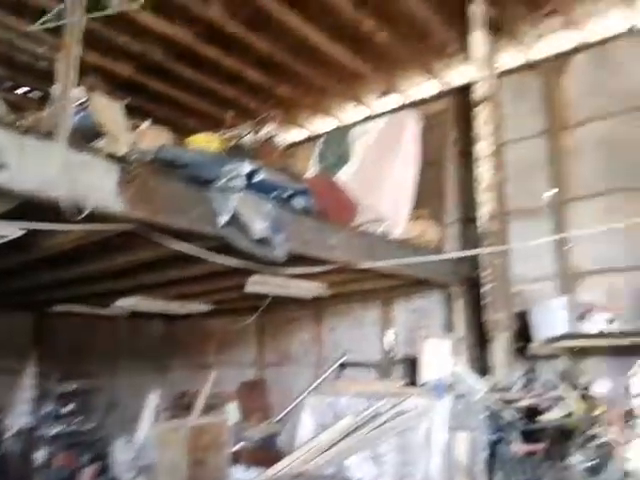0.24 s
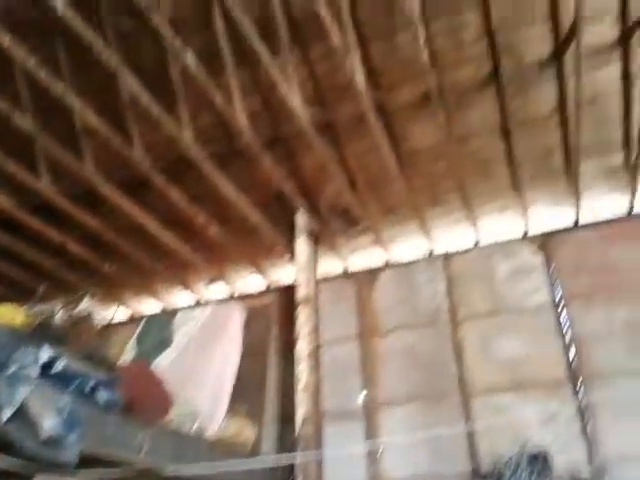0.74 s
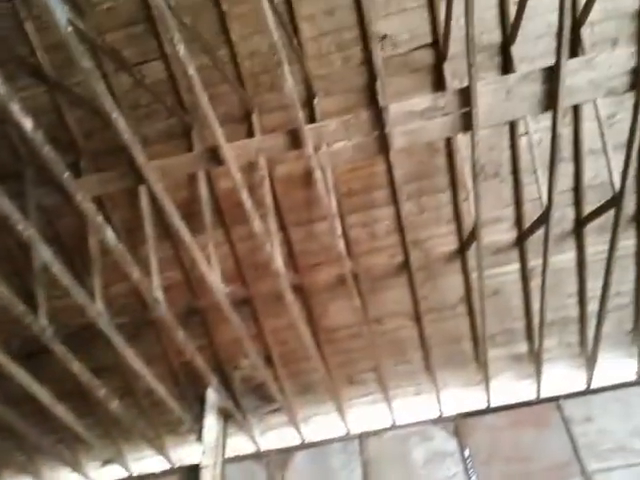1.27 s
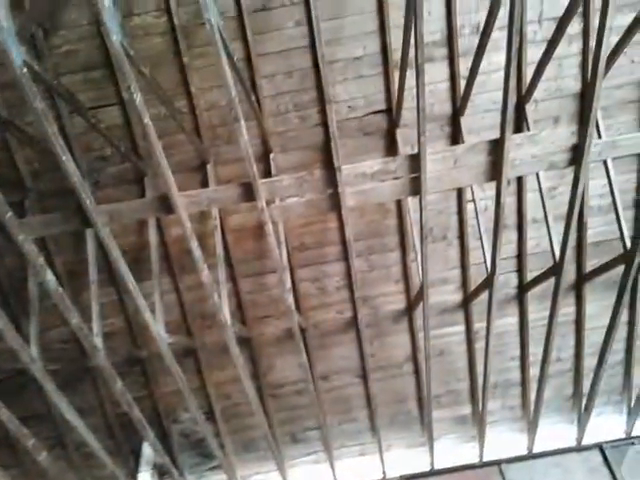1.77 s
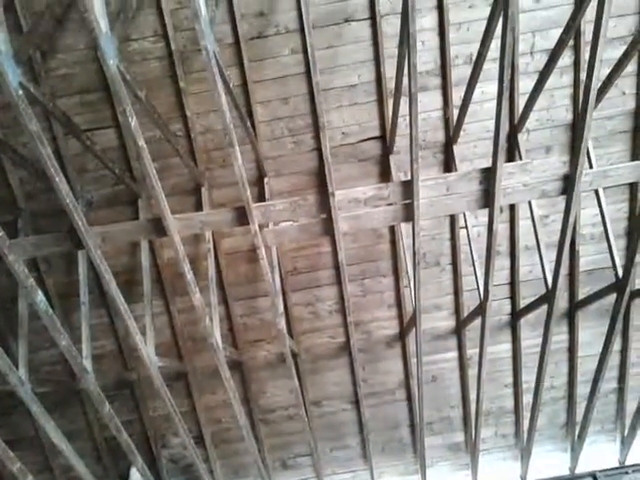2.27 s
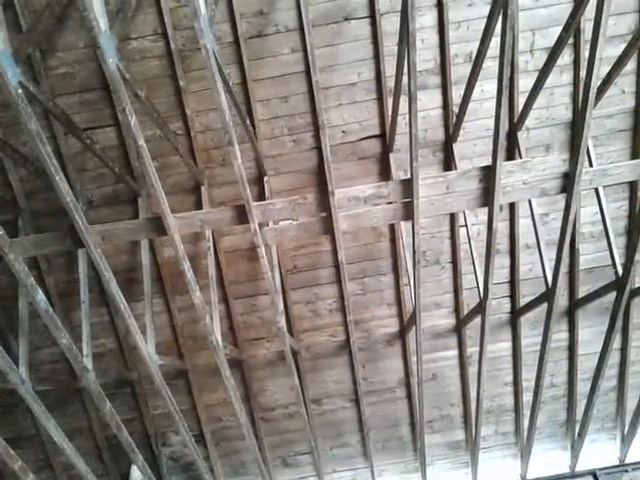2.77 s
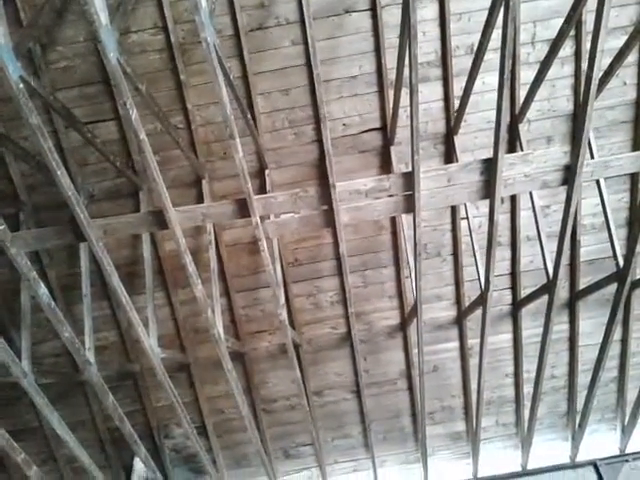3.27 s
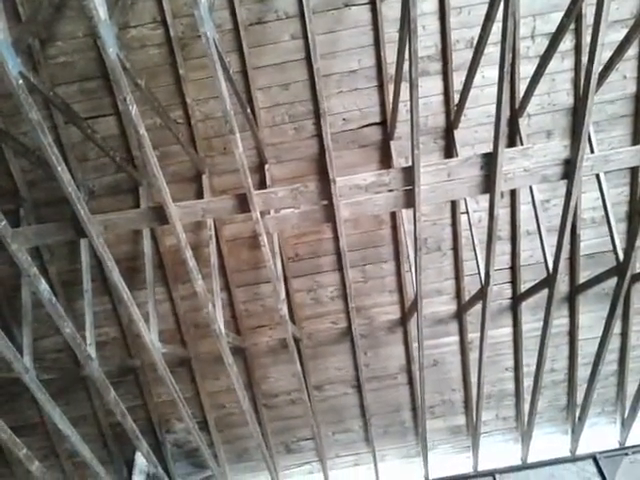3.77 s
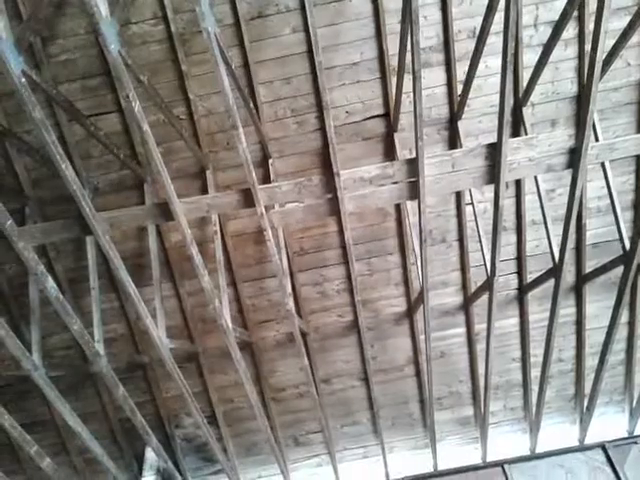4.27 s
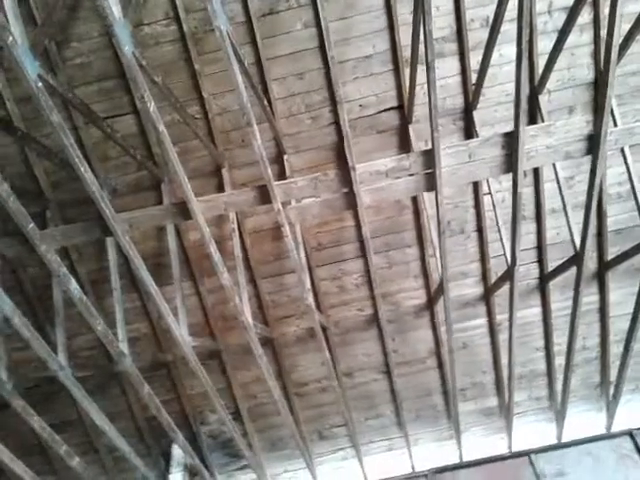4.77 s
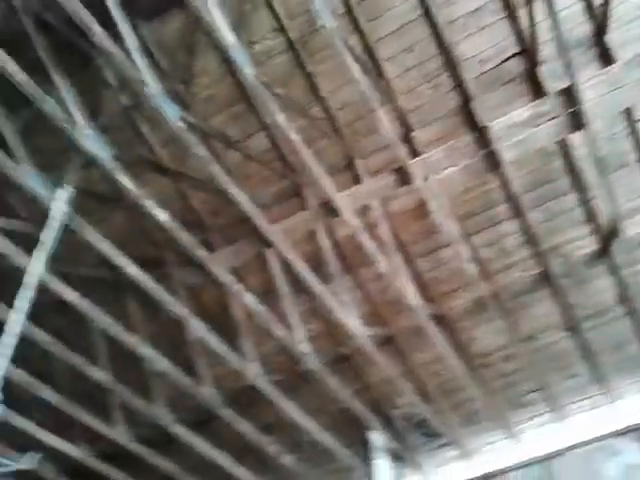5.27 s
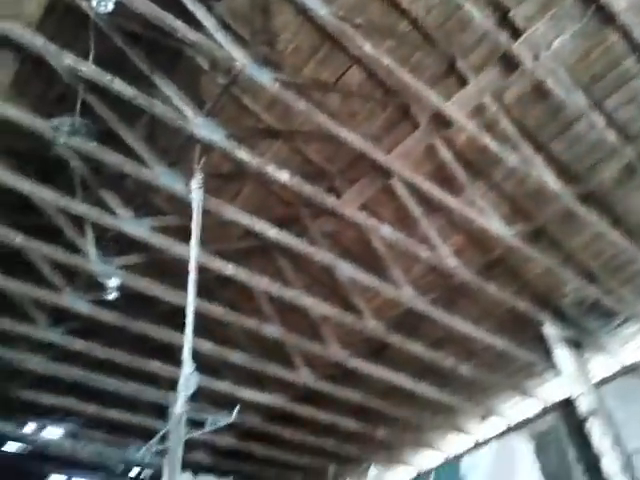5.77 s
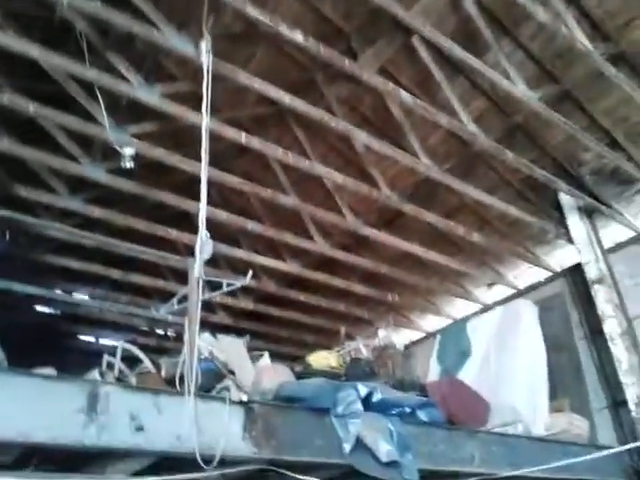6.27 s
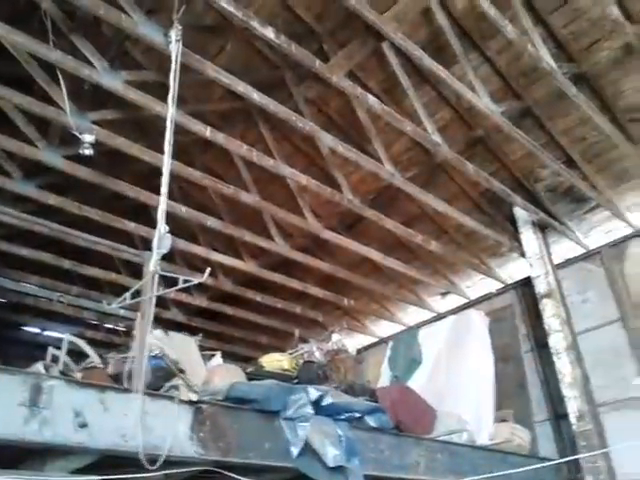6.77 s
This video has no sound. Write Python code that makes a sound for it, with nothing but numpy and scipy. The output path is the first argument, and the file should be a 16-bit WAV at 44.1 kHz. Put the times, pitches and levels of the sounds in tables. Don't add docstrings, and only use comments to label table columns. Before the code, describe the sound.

Swallows whistle, twitter and scold under the roof of a large echoing barn, over low wind rumble and hiss, with small taps and wooden knocks.

```python
import sys
import numpy as np
from scipy import signal
from scipy.fft import rfft, irfft, next_fast_len
from scipy.io import wavfile
from scipy.ndimage import uniform_filter1d

SR = 44100
rng = np.random.default_rng(int(sys.argv[2]) if len(sys.argv) > 2 else 0)


def elevation(decibels):
    levels = np.asarray(decibels, float)
    return 10 ** (levels / 20)


def transcribe(signal):
    frames = np.atleast_2d(signal).T
    limited = np.clip(frames, -1, 1)
    pcm = np.round(limited * 32767).astype(np.int16)
    wavfile.write(sys.argv[1], SR, pcm)


N = 310023


def on_log(hz, table):
    table_hz, values = np.transpose(table)
    return np.interp(np.log(np.maximum(hz, 1)), np.log(table_hz), values)


def colour(x, gain):
    size = next_fast_len(len(x))
    hz = np.arange(size // 2 + 1) * SR / size
    return irfft(rfft(x, size) * gain(hz), size)[:len(x)]


def walk(n, rate_hz):
    wander = uniform_filter1d(rng.standard_normal(N // 8)[:n], max(int(SR / rate_hz), 1))
    return wander / np.std(wander)


def add(track, s, x):
    i = int(s * SR)
    track[i:i + len(x)] += x[:N - i]


# (frequency [Hz], density [dB per Hz])
AIR_SPECTRUM = [(25, -26), (40, -19), (60, -9.5), (120, -8), (300, -12.5), (700, -21), (2000, -26),
                (3300, -26), (4800, -38), (7000, -31), (9500, -39.5), (12000, -42), (15600, -41),
                (16000, -67.5)]
# (time [s], rumble level [dB])
GUSTS = [(0, 0.8), (.25, 0.2), (.7, 1), (1.1, -1.2), (1.6, .8), (2.3, -0.8), (2.8, 0.9), (3.2, -0.5),
         (4.0, 1), (4.8, 3), (5.28, 3), (5.4, 0.2), (6.05, 1.6), (6.35, 0.8), (7.03, 4.5)]


def wind_and_hiss():
    air = colour(rng.standard_normal(N), lambda f: elevation(on_log(f, AIR_SPECTRUM)))
    air = air * elevation(-55.5) / np.std(air)
    rumble = colour(air, lambda f: 1 / (1 + (f / 1130) ** 4))
    hiss = air - rumble
    gust_db = np.interp(np.arange(N) / SR, *np.transpose(GUSTS))
    return elevation(gust_db) * rumble, hiss


# (frequency [Hz], time to fall 60 dB [s])
BARN_T60 = [(1000, 2.8), (3000, 0.92), (5500, 0.76), (7500, 0.71), (11000, 0.75), (16000, 0.12)]


def barn(dry, direct_db, early_db, linger, lumpy_db=3.5):
    t = np.arange(SR) / SR
    f, frame_s, noise = signal.stft(rng.standard_normal(SR), SR, nperseg=256)
    decay = elevation(-60 * frame_s / linger / on_log(f, BARN_T60)[:, None])
    tail = signal.istft(noise * decay, SR, nperseg=256)[1][:SR]
    lumps = elevation(lumpy_db * np.exp(-t / 0.14) * np.resize(walk(SR // 4, 250), SR))
    onset = 1 - np.exp(-t / 0.004)
    rafters = 1 + elevation(early_db) * np.exp(-t / 0.0071)
    tail = tail * lumps * onset * rafters
    tail = tail / np.sqrt(np.sum(tail ** 2))
    return elevation(direct_db) * dry + signal.fftconvolve(dry, tail)[:N]


# (time [s], ring [Hz], ring time to fall 60 dB [s], ring level [dB], tick level [dB])
TAPS = [
    (0.682, 295, 0.017, -38, -40),
    (0.792, 170, 0.0081, -27.5, -30),
    (5.247, 130, 0.025, -33, -65),
    (5.379, 294, 0.046, -47.5, -71),
]


def taps():
    track, t = np.zeros(N), np.arange(4096) / SR
    for s, hz, t60, ring_db, tick_db in TAPS:
        ring = elevation(ring_db - 60 * t / t60) * np.sin(2 * np.pi * hz * t)
        tick = colour(rng.standard_normal(4096) * elevation(-60 * t / .008), lambda f: 1 / (1 + (f / 2500) ** 4))
        add(track, s, ring + elevation(tick_db - 60 * t / 0.14) * tick)
    return track


# (time [s], centre [Hz], width [Hz], length [s], level [dB])
KNOCKS = [
    (0.708, 7740, 3000, 0.018, -68),
    (1.356, 1310, 300, 0.09, -55.5),
    (2.826, 1690, 295, 0.037, -53),
    (4.256, 5700, 6000, 0.01, -62),
    (5.447, 1608, 1800, 0.0066, -47),
    (5.673, 2260, 1910, 0.01, -47),
    (5.913, 2400, 3770, 0.035, -56),
    (5.93, 1880, 1980, 0.022, -51.5),
    (6.346, 8000, 5960, 0.0051, -66),
]


def knocks():
    track, t = np.zeros(N), np.arange(4096) / SR
    for s, hz, width_hz, length, db in KNOCKS:
        burst = rng.standard_normal(4096) * 8 * t / length * np.exp(-3 * t / length)
        wood = colour(burst, lambda f: 1 / (1 + ((f - hz) / width_hz * 2) ** 2))
        add(track, s, elevation(db) * 4 * wood)
    return barn(track, direct_db=2, early_db=3, linger=1.1)


def birds(notes, partials_db, turn, reach, arch, rough, breath_db, lean):
    track = np.zeros(N)
    for s, length, start_hz, end_hz, db in notes:
        u = np.linspace(0, 1, int(length * SR))
        turn_hz = start_hz + reach * (end_hz - start_hz) + arch * end_hz
        glide = np.interp(u, [0, turn, 1], [start_hz, turn_hz, end_hz])
        hz = uniform_filter1d(glide, len(u) // 10, mode="nearest")
        phase = 2 * np.pi * np.cumsum(hz * (1 + rough * walk(len(u), 738))) / SR
        tone = sum(elevation(p) * np.sin((k + 1) * phase) for k, p in enumerate(partials_db))
        swell = np.sin(np.pi * u ** lean) ** .5
        breath = 1 + elevation(breath_db) * walk(len(u), 1500)
        add(track, s, elevation(db) * swell * breath * tone)
    return track


def openings(rows, open_s, shut_s):
    opens, shuts, first_db, last_db, shut_db = np.transpose(rows)
    before_db = np.append(first_db[0], shut_db[:-1])
    s = np.ravel([opens - open_s, opens, shuts, shuts + shut_s], "F")
    db = np.ravel([before_db, first_db, last_db, shut_db], "F")
    return np.interp(np.arange(N) / SR, np.maximum.accumulate(s), db)


# (time [s], length [s], start [Hz], end [Hz], level [dB])
SLIDES = [
    (1.512, 0.032, 9000, 6760, -77),
    (1.818, 0.024, 2830, 4770, -47.5),
    (1.845, 0.023, 3760, 3130, -55),
    (4.49, .05, 3400, 3800, -58.5),
    (4.535, 0.025, 3460, 3094, -51),
    (4.575, 0.022, 3200, 4230, -47.5),
    (4.71, 0.054, 3640, 3990, -46),
    (4.76, 0.029, 3650, 2670, -43.5),
    (4.81, 0.03, 3010, 4540, -40.5),
]
# (opens [s], shuts [s], gain on opening [dB], gain on shutting [dB], gain once shut [dB])
SLIDE_OPENINGS = [
    (1.5, 1.685, 20, 28, -6),
    (1.815, 2.06, 10, 2.1, -3),
    (4.48, 4.95, 9.8, 1.3, -3),
]


def far_slides():
    slides = birds(SLIDES, [0], turn=.55, reach=.72, arch=0, rough=.006, breath_db=-28, lean=.95)
    slides = barn(slides, direct_db=-15, early_db=-20, linger=1.6, lumpy_db=1.5)
    return slides * elevation(openings(SLIDE_OPENINGS, open_s=.02, shut_s=.015))


# (length [s], start [Hz], end [Hz])
DOOR_DROP = (0.043, 4250, 2740)
DOOR_LOW = (0.013, 2850, 2600)
DOOR_HIGH = (.02, 5350, 4900)
DOOR_FLICK = (.016, 6400, 4900)
DOOR_THIN = (.06, 4380, 4400)
# (time [s], level [dB])
DOOR_DROPS = [
    (6.512, -57),
    (6.634, -50.5),
    (6.765, -46),
    (6.892, -45),
]
DOOR_LOWS = [(6.735, -50.5), (6.865, -50.5), (6.99, -50.5)]
DOOR_HIGHS = [(6.745, -60), (6.87, -60), (7.003, -63)]
DOOR_FLICKS = [(6.638, -59.5), (6.763, -62)]
DOOR_THINS = [(6.54, -70)]


def doorway_bird():
    phrase = [(DOOR_DROP, DOOR_DROPS), (DOOR_LOW, DOOR_LOWS), (DOOR_HIGH, DOOR_HIGHS),
              (DOOR_FLICK, DOOR_FLICKS), (DOOR_THIN, DOOR_THINS)]
    notes = [(s, *shape, db) for shape, times in phrase for s, db in times]
    song = birds(notes, [0], turn=.65, reach=.93, arch=0, rough=.022, breath_db=-4, lean=2.3)
    return barn(song, direct_db=-1, early_db=8, linger=.9)


# (time [s], length [s], start [Hz], end [Hz], level [dB])
TWITTER = [(0, 0.01236, 3110, 5010, -32.5), (.02, 0.028, 9370, 6960, -55), (.09, .042, 6600, 7300, -55),
           (.175, 0.036, 6780, 5280, -37), (.19, 0.042, 4900, 3110, -37), (.275, 0.02, 9400, 7550, -49),
           (.285, 0.023, 6920, 3410, -32.5), (.29, 0.024, 3050, 2910, -46.5),
           (.885, 0.021, 6980, 5220, -38.5), (.878, 0.027, 5100, 2860, -44), (.95, 0.014, 7900, 5800, -49),
           (.995, 0.045, 7050, 5800, -45), (1.0, .03, 5300, 3274, -46), (3.6, .04, 4300, 5300, -60),
           (1.35, .03, 7000, 5250, -58.5), (1.73, 0.039, 5800, 8400, -51.5),
           (1.745, 0.0414, 7320, 6900, -51.5), (1.825, 0.026, 8000, 6560, -51),
           (2.33, 0.022, 6200, 6220, -39), (2.47, .015, 6600, 6510, -59), (2.51, 0.043, 2295, 4680, -45),
           (2.672, 0.013, 6900, 6570, -39.5), (3.85, 0.02, 3220, 4330, -49.5),
           (5.98, .035, 6900, 8050, -66.5)]


def twitter():
    return birds(TWITTER, [0, -30], turn=.3, reach=.36, arch=.001, rough=0.02, breath_db=-7, lean=0.5)


# (time [s], length [s], start [Hz], end [Hz], level [dB])
CHURRS = [
    (3.378, 0.078, 1620, 2303, -54.5),
    (3.495, 0.038, 1410, 2614, -49.5),
    (4.963, 0.029, 1283, 1785, -48.5),
    (5.05, 0.041, 1523, 1772, -47),
    (5.42, 0.05, 1016, 1700, -55),
    (5.92, 0.048, 1354, 1880, -63.5),
]
# (frequency [Hz], gain [dB])
CHURR_THROAT = [(1200, -32), (2000, -9), (3300, 0.5), (5000, -1), (6800, -5.5), (8200, -14.5),
                (10000, -33.5), (13000, -39)]


def churrs():
    voice = birds(CHURRS, np.zeros(7), turn=.3, reach=.65, arch=0.0188, rough=0.0266, breath_db=0, lean=0.28)
    return colour(voice, lambda f: elevation(on_log(f, CHURR_THROAT)))


# (time [s], length [s], start [Hz], end [Hz], level [dB])
SCOLDS = [
    (2.218, .055, 1387, 1934, -38.5),
    (2.308, 0.054, 1306, 1703, -40.5),
    (2.41, 0.021, 1185, 1299, -38),
    (2.51, 0.056, 1185, 1393, -42.5),
    (2.66, 0.0418, 1481, 1724, -43),
    (2.805, 0.035, 1490, 1728, -42),
    (2.9, 0.043, 1482, 1635, -53.5),
]
# (frequency [Hz], gain [dB])
SCOLD_THROAT = [(1000, -20.5), (1600, -19.5), (3000, -11.5), (4500, -11.5), (6200, -3.5), (7500, -10),
                (9000, -21.5), (11000, -24.5), (14000, -49)]


def scolds():
    voice = birds(SCOLDS, np.zeros(8), turn=.3, reach=.55, arch=.02, rough=.1, breath_db=-2, lean=.8)
    return colour(voice, lambda f: elevation(on_log(f, SCOLD_THROAT)))


# (time [s], length [s], start [Hz], end [Hz], level [dB])
CHIRPS = [
    (1.735, 0.025, 1350, 2030, -51.5),
    (3.545, 0.014, 1480, 2085, -40.5),
    (3.63, 0.0303, 1796, 1954, -36),
    (3.722, 0.034, 1738, 1874, -39),
]
# (frequency [Hz], gain [dB])
CHIRP_THROAT = [(1200, -33), (2000, -39.5), (3800, -7.5), (5800, 2.5), (7000, -16), (8200, -16),
                (10000, -20), (13000, -37)]


def chirps():
    voice = birds(CHIRPS, np.zeros(7), turn=0.304, reach=0.253, arch=.12, rough=0.028, breath_db=-5.5, lean=0.13)
    return colour(voice, lambda f: elevation(on_log(f, CHIRP_THROAT)))


def flock():
    voices = chirps() + churrs() + scolds() + twitter()
    return barn(voices, direct_db=-10, early_db=6, linger=1.0, lumpy_db=3)


# (time [s], length [s], start [Hz], end [Hz], level [dB])
PIPS = [
    (.157, 0.028, 4440, 5120, -38),
    (.868, 0.023, 4300, 5100, -48),
]
# (time [s], length [s], start [Hz], end [Hz], level [dB])
LOW_WHISTLES = [
    (.229, 0.063, 4546, 5503, -23.5),
    (.94, 0.0461, 4730, 5420, -30),
    (.995, 0.0088, 5410, 5420, -23.5),
    (1.012, 0.013, 5280, 5500, -39.5),
]
# (time [s], length [s], start [Hz], end [Hz], level [dB])
HIGH_WHISTLES = [
    (.155, 0.057, 5570, 6960, -39),
    (.27, 0.042, 7370, 6670, -34),
    (.868, 0.035, 5910, 6760, -44),
    (.985, 0.063, 7000, 7010, -44),
]


def nearest_bird():
    groups = [(HIGH_WHISTLES, 1.01, .04), (LOW_WHISTLES, .84, .001), (PIPS, .4, .001)]
    song = sum(birds(notes, [0, -23], .11, reach, arch, rough=.005, breath_db=-21, lean=.8)
               for notes, reach, arch in groups)
    return barn(song, direct_db=-7, early_db=-3.5, linger=0.79)


def microphone_port(x):
    return colour(x, lambda f: 1 + (elevation(13.5) - 1) / (1 + ((f - 6900) / 1176 * 2) ** 2))


# (opens [s], shuts [s], gain on opening [dB], gain on shutting [dB], gain once shut [dB])
GATE = [(0, 0.785, -1.5, 0, -3.5), (0.869, 1.423, 2.5, -2.5, -8), (1.52, 1.663, -3, -1.5, -4.5),
        (1.738, 2.04, 1, -1, -6), (2.23, 2.725, -0.5, 2, -0.5), (2.82, 3.115, 2.5, -3.5, -10.5),
        (3.416, 3.95, -1, -1.5, -10.5), (4.271, 4.363, -3, -7.5, -9.5), (4.553, 5.0, -4.5, -0.8, 2),
        (5.064, 5.294, .9, -2.5, -9), (5.432, 5.596, 0.5, 0.5, -4), (5.949, 6.122, 1.5, -5, -11),
        (6.527, 7.0, -7, -5, 0.5)]


def suppressor(high, rumble):
    gate_db = openings(GATE, open_s=0.026, shut_s=0.037)
    return elevation(gate_db) * high + elevation(0.61 * gate_db) * rumble


def scene():
    barn_sound = nearest_bird() + flock() + far_slides() + doorway_bird() + knocks()
    rumble, hiss = wind_and_hiss()
    mono = suppressor(microphone_port(barn_sound + hiss), rumble) + taps()
    side = elevation(-32.0) * np.diff(np.roll(mono, 300), prepend=0)
    return np.array([mono + side, mono - side])


def top_cut(x):
    return signal.sosfilt(signal.butter(12, 16190, fs=SR, output="sos"), x)


def record(dry):
    dry = signal.sosfilt(signal.butter(2, 45, "high", fs=SR, output="sos"), dry)
    dry = signal.sosfilt(signal.ellip(10, .3, 60, 15750, fs=SR, output="sos"), dry)
    return top_cut(dry)


dry = scene()
out = record(dry)
transcribe(out)
```